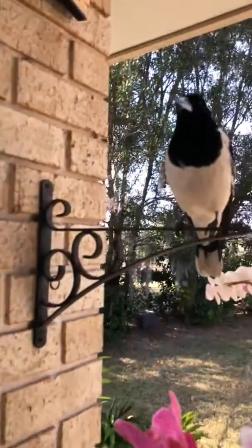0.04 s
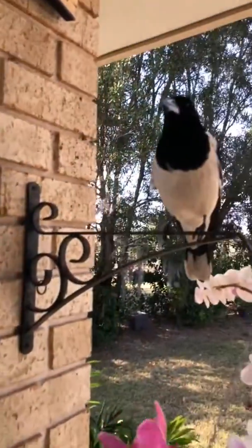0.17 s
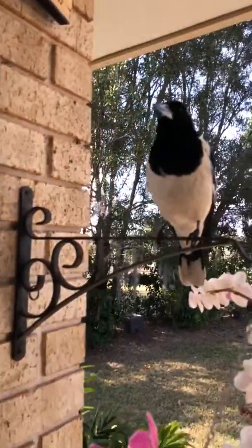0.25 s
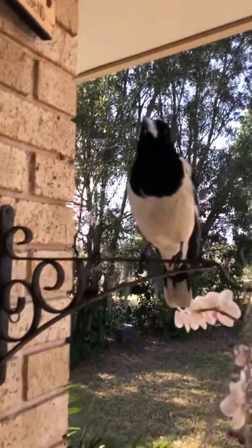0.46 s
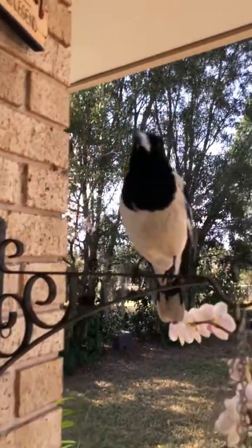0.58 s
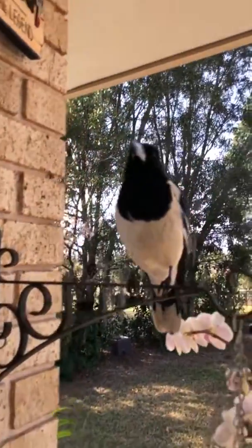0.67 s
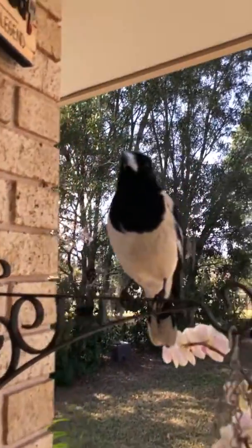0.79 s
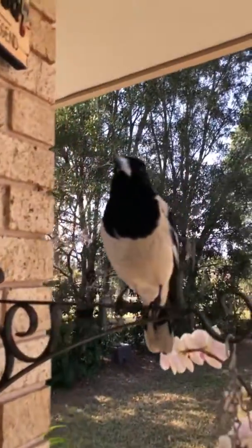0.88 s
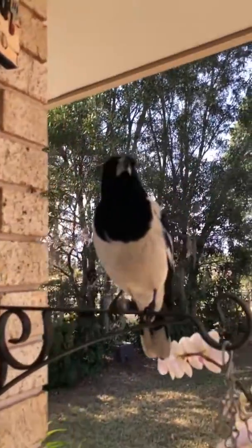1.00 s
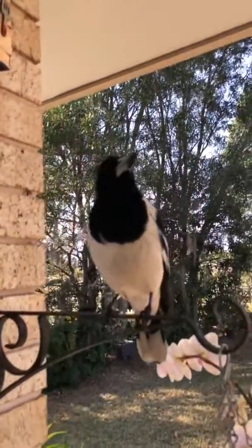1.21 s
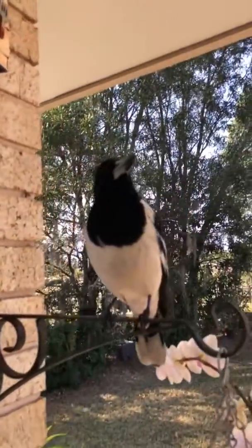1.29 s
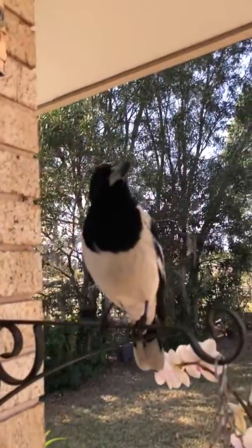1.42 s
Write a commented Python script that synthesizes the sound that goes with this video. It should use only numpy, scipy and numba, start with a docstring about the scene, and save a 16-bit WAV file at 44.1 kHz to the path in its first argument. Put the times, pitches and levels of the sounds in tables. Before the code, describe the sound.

Close butcherbird song of clear whistles and short rasps, another bird chirping faintly behind.

```python
"""Under a veranda roof, beside a garden. Over a low outdoor rumble a small bird chirps in the trees.
Close by, a butcherbird sings: a falling slur on two voices, two harsh rasps, a long low flute note,
a soft rasp and a thin closing note. Its whistles are nearly pure tones; its rasps are uneven pulses
from the voice organ that ring in the throat and windpipe. Wall and roof add a short ring."""
import sys
import numpy as np
from scipy import signal
from scipy.fft import rfft, irfft, next_fast_len
from scipy.io import wavfile
from scipy.ndimage import uniform_filter1d
from numba import njit

SR = 44100
rng = np.random.default_rng(int(sys.argv[2]) if len(sys.argv) > 2 else 0)


def master_out(mix):
    """Clip the mix to full scale and print it as 16-bit PCM to the path in sys.argv[1]."""
    frames = np.transpose(np.atleast_2d(mix))
    ceiling = np.clip(frames, -1, 1)
    pcm = np.round(ceiling * 32767).astype(np.int16)
    wavfile.write(sys.argv[1], SR, pcm)


N = 63945
T = np.arange(-int(.2 * SR), N) / SR  # time [s]; starts early so echoes are already ringing
TOP_HZ, FLICKER_HZ = 15750, 60  # highest overtone; how fast overtones come and go


def gain(db):
    """Turn decibels into a multiplier."""
    return 10 ** (np.asarray(db) / 20)


def unit(x):
    """Scale to an average power of 1."""
    return x / np.sqrt(np.mean(x ** 2))


def curves(table, start=0):
    """Join a table's rows into curves over time, plus a gate that is 0 beyond its ends."""
    rows = np.array(table, float)
    times = rows[:, 0] + start
    gate = uniform_filter1d(((T >= times[0]) & (T <= times[-1])) * 1., size=128)
    return [np.interp(T, times, column) for column in rows.T[1:]] + [gate]


def gain_at(spectrum, hz):
    """Look up the multiplier at each frequency."""
    freqs, db = np.array(spectrum, float).T
    return gain(np.interp(np.log(hz + 1), np.log(freqs), db))


def colour(x, spectrum):
    """Filter by rows of (frequency [Hz], gain [dB])."""
    size = next_fast_len(len(x))
    hz = np.arange(size // 2 + 1) * SR / size
    return irfft(rfft(x, size) * gain_at(spectrum, hz), size)[:len(x)]


def noise():
    """Plain white hiss."""
    return rng.standard_normal(len(T))


def wobble(rate):
    """A smooth random curve that turns about `rate` times a second."""
    width = max(int(SR / rate), 1)
    return unit(uniform_filter1d(uniform_filter1d(noise(), width), width))


def wavering_phase(hz, waver, rate):
    """The angle of a vibration whose pitch strays by the fraction `waver`."""
    return 2 * np.pi * np.cumsum(hz * (1 + waver * wobble(rate))) / SR


def steady(x):
    """Even out the loudness."""
    return x / np.sqrt(np.abs(uniform_filter1d(x ** 2, size=400)) + 1e-12)


@njit
def resonate(x, hz, width):
    """A moving resonance: the smaller its width, the more it rings."""
    y, band, low = np.empty(len(x)), 0., 0.
    for i in range(len(x)):
        g = np.tan(np.pi * hz[i] / SR)
        v = (band + g * (x[i] - low)) / (1 + g * (g + width))
        band, low = 2 * v - band, low + 2 * g * v
        y[i] = width * v
    return y


def echoes(x, fade_s, delay_s, treble_db):
    """Scattered reflections, duller than the source, that drop 60 dB in `fade_s`."""
    t = np.arange(len(T)) / SR
    tail = unit(noise() * (t > delay_s) * np.exp(-np.log(1000) * t / fade_s)) / np.sqrt(len(t))
    return colour(signal.fftconvolve(x, tail)[:len(T)], [(2500, 0.006), (12000, treble_db)])


def whistle(table, overtones, start=0, waver=0.004, flutter_db=0.96):
    """A slightly trembling tone whose upper overtones come and go."""
    hz, db, gate = curves(table, start)
    phase = wavering_phase(hz, waver, rate=400)
    tone = np.sin(phase)
    for k in range(2, int(TOP_HZ / hz.min()) + 1):
        flicker = 1 + 0.33 * (k > 2) * wobble(FLICKER_HZ)
        tone += flicker * gain_at(overtones, k * hz) * (k * hz < TOP_HZ) * np.sin(k * phase)
    return np.sqrt(2) * tone * gate * gain(db + flutter_db * wobble(61))


def voice_organ(hz, rough):
    """A bird's membranes pulse: evenly at roughness 0, as pure noise from 1 up."""
    rough = np.clip(rough, 0, 1)
    phase = wavering_phase(hz, .06 * rough, rate=500)
    pulses = sum(np.cos(k * phase) * (k * hz < TOP_HZ) for k in range(1, int(TOP_HZ / hz.min()) + 1))
    puffs = noise() * (1 + np.cos(phase))
    return np.sqrt(1 - rough ** 2) * unit(pulses) + rough * unit(puffs)


# Tone colour of the outdoor background: (frequency [Hz], gain [dB])
HISS_COLOUR = [(25, -29), (50, -12.5), (100, -6.5), (180, -11.5), (260, -9.5), (350, -14.5), (550, -19),
               (1000, -18.5), (1700, -19), (2400, -26), (4000, -29.5), (8000, -34), (12000, -37),
               (15600, -44)]
RUMBLE_COLOUR = [(15, -45), (30, -25.5), (48, -7.5), (70, 0), (100, 0), (125, -12.5), (200, -18.5),
                 (320, -29), (700, -52)]

def garden():
    """Faint hiss, a low rumble and one soft low bump."""
    hiss = unit(colour(noise(), HISS_COLOUR))
    rumble = unit(colour(noise(), RUMBLE_COLOUR))
    bump = np.exp(-((T - 1.15) / 0.0075) ** 2 / 2) * np.sin(2 * np.pi * 202.4 * T)
    return gain(-66) * hiss + gain(-61.5) * rumble + gain(-50) * bump


# Distant chirps: (start time [s], base level [dB])
CHIRPS = [(-.085, -58), (.505, -53.5), (1.1, -53)]
# A chirp's two voices: (time into the chirp [s], pitch [Hz], relative level [dB])
CHIRP_LOW = [(0, 2343, -30.5), (.014, 2470, -8.5), (.026, 2590, -7.5), (.04, 2870, -10.5),
             (.05, 2735, -19.5)]
CHIRP_HIGH = [(.022, 3520, -1.5), (.029, 3930, -1), (.038, 4070, 8), (.05, 4500, -2), (.062, 4280, -25)]
# Their overtones: (frequency [Hz], level relative to the base tone [dB])
LOW_OVERTONES = [(4700, 1.5), (5100, 8), (5700, -4), (7000, -25.5), (8000, -9.5), (9500, -26),
                 (11500, -15.5), (15000, -36.5)]
HIGH_OVERTONES = [(8000, -25.5), (12000, -36), (16000, -43)]

def small_bird():
    """Rising, hoarse two-voiced chirps, smeared by echoes from the trees."""
    voices = (CHIRP_LOW, LOW_OVERTONES), (CHIRP_HIGH, HIGH_OVERTONES)
    chirps = sum(gain(db) * whistle(voice, overtones, start, waver=.022, flutter_db=3.5)
                 for start, db in CHIRPS for voice, overtones in voices)
    trees = echoes(chirps, fade_s=0.45, delay_s=0.0034, treble_db=-2.5)
    return gain(-2.5) * chirps + gain(-1.5) * trees


# Tone colour of the veranda's echo: (frequency [Hz], gain [dB])
VERANDA_COLOUR = [(630, -2.5), (760, 3), (870, -4), (1300, 2.5), (1750, -5), (3000, 1)]

def veranda(song):
    """Wall and roof throw the song back as a short ring."""
    ring = echoes(song, fade_s=0.36, delay_s=0.0061, treble_db=-6)
    return gain(-13.5) * colour(ring, VERANDA_COLOUR)


# The butcherbird's breath: (time [s], level [dB])
BREATH = [(.19, -66), (.21, -63.5), (.235, -57.5), (.26, -58.5), (.29, -81), (.65, -83), (.662, -46),
          (.677, -45), (.69, -59), (.718, -84.5), (.728, -46), (.745, -52.5), (.77, -58.5), (.83, -96.5),
          (1.275, -92), (1.296, -52.5), (1.315, -56.5), (1.335, -58.5), (1.36, -90)]
# Its tone colour: (frequency [Hz], gain [dB])
BREATH_COLOUR = [(400, -28), (750, 4), (1150, 0), (1450, -2.5), (2100, -8), (3200, 0), (4000, -8),
                 (5000, -19.5), (6000, -8), (8500, -19.5), (11000, -36), (16000, -33.5)]

def bill(click_s=.7187, decay_s=0.00065):
    """Air rushes through the bill, which gives one tiny click as it opens."""
    db, gate = curves(BREATH)
    click_shape = (T >= click_s) * np.exp(-np.abs(T - click_s) / decay_s)
    click = click_shape * unit(resonate(noise(), np.full(len(T), 7000.), 0.87))
    air = unit(colour(noise(), BREATH_COLOUR))
    return air * gate * gain(db) + gain(-49) * click


# Buzz on the whistles: (time [s], pitch [Hz], level [dB], roughness [0-1])
BUZZ = [(.28, 763, -71.5, .2), (.31, 766, -76, 0.3), (.345, 746, -65.5, 0.23), (.385, 724, -59, 0.5),
        (.405, 675, -77.5, 0.3), (.42, 700, -90, 0.5)]
# Windpipe resonances, bill nearly shut: (frequency [Hz], gain [dB])
SHUT_WINDPIPE = [(1500, -29.5), (2200, 5), (2700, -12), (4000, -5.5), (5300, -13.5), (6200, -3),
                 (6700, -5.5), (7300, 6), (8000, -15), (9500, -16), (10300, -6), (11000, -14.5),
                 (11900, -1.5), (13000, -20), (14200, -13.5), (15300, -10), (16000, -13)]

def buzz():
    """Faint high overtones where the two voices rub together."""
    hz, db, rough, gate = curves(BUZZ)
    return steady(colour(voice_organ(hz, rough), SHUT_WINDPIPE)) * gate * gain(db)


# Thin top of the rasps: (time [s], pitch [Hz], level [dB], roughness [0 = smooth], resonance [Hz])
SIZZLE = [(.65, 920, -87.5, 0.89, 6080), (.664, 898, -56, 1.11, 6200), (.674, 915, -49.5, 0.7, 6300),
          (.692, 920, -75, 1.06, 7800), (.72, 713, -79, 0.96, 8200), (.731, 690, -43, 0.8, 7860),
          (.746, 684, -58.5, 0.8, 8360), (.752, 672, -55.5, 0.8, 10800), (.762, 665, -50, 0.6, 10600),
          (.769, 644, -51, 0.3, 9200), (.79, 660, -54.5, .35, 9100), (.815, 636, -73, 0.5, 9000),
          (.85, 648, -87, .4, 9200)]
# Windpipe resonances, bill open: (frequency [Hz], gain [dB])
OPEN_WINDPIPE = [(2000, -25.5), (4500, -20.5), (5900, 6.5), (7100, -7.5), (8200, 6), (9100, 0), (9800, -11),
                 (11000, -1), (12300, -12.5), (13700, -4), (16000, -13.5)]

def sizzle():
    """High overtones ring the open windpipe, with one resonance leading."""
    hz, db, rough, peak_hz, gate = curves(SIZZLE)
    pipe = colour(voice_organ(hz, rough), OPEN_WINDPIPE)
    peak = resonate(pipe, peak_hz, 1 / 12.4)
    return steady(peak + gain(-12.5) * pipe) * gate * gain(db)


# Reedy notes: (time [s], pitch [Hz], base tone [dB], first overtone [dB], second overtone [dB])
REEDY_NOTE = [(.735, 688.3, -53, -52, -70.5), (.749, 685.6, -53, -50, -51), (.762, 654, -46, -43, -31.5),
              (.773, 675, -50, -36.5, -46), (.787, 641.4, -49.5, -45.5, -45),
              (.807, 638, -48, -46.5, -63.5), (.82, 655.5, -64.5, -51.5, -69.5),
              (.85, 630, -59.5, -50.5, -71.5)]
CLOSING_NOTE = [(1.35, 1120, -71, -89, -75), (1.367, 1090, -66, -62, -61), (1.388, 1081, -62, -50, -73),
                (1.397, 1081, -61, -63.5, -68), (1.411, 1082, -54.5, -59, -72), (1.44, 1077, -49, -71, -73),
                (1.46, 1074, -51, -54, -84)]
# Their weak higher overtones: (frequency [Hz], level relative to the base tone [dB])
REEDY_OVERTONES = [(3000, -25), (4300, -36.5), (5500, -32.5), (6500, -28), (7500, -20), (9000, -38),
                   (12000, -43), (16000, -32)]

def reedy_notes():
    """Two unsteady notes whose weight sinks to the lower tones as the bill closes."""
    notes = 0
    for table in REEDY_NOTE, CLOSING_NOTE:
        hz, *levels, gate = curves(table)
        phase = wavering_phase(hz, 0.013, rate=170)
        strong = sum(gain(db + wobble(100)) * np.sin(k * phase) for k, db in enumerate(levels, 1))
        weak = sum(gain_at(REEDY_OVERTONES, k * hz) * wobble(FLICKER_HZ) * np.sin(k * phase)
                   for k in range(len(levels) + 1, int(TOP_HZ / hz.max())))
        notes += np.sqrt(2) * gate * (strong + gain(levels[0]) * weak)
    return notes


# Rasps: (time [s], pitch [Hz], level [dB], throat resonance [Hz], roughness [0-1])
FIRST_RASP = [(.652, 934.5, -69, 4230, 0.75), (.664, 920, -42, 3930, 0.83), (.672, 912, -43.5, 3030, 0.46),
              (.683, 968, -51, 2820, 0.77), (.695, 948, -51.5, 2880, 0.8), (.712, 897, -63, 2920, 0.8)]
SECOND_RASP = [(0.721, 740, -49, 4800, .9), (0.727, 733.7, -45.5, 4470, .9),
               (0.738, 686.4, -42.5, 3600, .8), (0.748, 670.6, -38, 2600, 0.5),
               (.757, 665, -43.5, 2560, 0.55), (0.769, 669.5, -50, 2810, 0.3), (.79, 640, -68.5, 2980, 0.6),
               (.82, 649, -65.5, 3224, 0.7)]
SOFT_RASP = [(1.278, 640, -78, 3380, 0.89), (1.296, 649.7, -59, 3495, 0.87), (1.311, 639, -59, 2940, 0.41),
             (1.32, 658, -48, 2680, 0.33), (1.327, 663, -61, 2600, 0.33), (1.344, 670, -59.5, 2790, 0.85),
             (1.365, 670, -66.5, 3150, .5), (1.40, 670, -68, 3200, 0.42)]

def rasps(sharpness=4.3, grit_db=2.5):
    """Rough pulses pass through a throat resonance that sinks as the bill closes."""
    notes = 0
    for table in FIRST_RASP, SECOND_RASP, SOFT_RASP:
        hz, db, throat_hz, rough, gate = curves(table)
        pulses = voice_organ(hz, rough)
        throat = resonate(pulses, throat_hz, 1 / sharpness)
        throat = resonate(throat, throat_hz, 2 / sharpness)
        octave_below = gain(-9) * resonate(pulses, throat_hz / 2, 0.24)
        notes += steady(throat + octave_below) * gate * gain(db + grit_db * rough * wobble(400))
    return notes


# Whistled notes: (time [s], pitch [Hz], level [dB])
LEAD_IN = [(.045, 710, -62), (.06, 766, -53.5), (.072, 797, -50), (.095, 788, -58), (.11, 780, -65.5)]
SLUR = [(.193, 1677, -60), (.205, 1708, -34.5), (.218, 1737, -21.5), (.234, 1733, -18.5),
        (.241, 1703, -20.5), (.248, 1635, -33.5), (.257, 1567, -19.5), (.272, 1337, -29.5),
        (.29, 1105, -32), (.305, 986, -40.5), (.318, 915, -46.5), (.335, 858, -36), (.355, 861.4, -35),
        (.41, 862, -31.5), (.44, 862.5, -34.5), (.465, 853.6, -40), (.49, 866, -51), (.51, 859.6, -68.5)]
SECOND_VOICE = [(.232, 801, -67), (.254, 794, -48), (.295, 775.3, -38), (.317, 760.5, -32.5),
                (.34, 754, -46.5), (.378, 778, -42.5), (.392, 775, -29), (.407, 769.6, -44),
                (.432, 773, -44.5), (.462, 741.2, -45), (.487, 745.8, -56), (.51, 762.5, -57),
                (.545, 726, -66)]
UNDER_RASPS = [(0.637, 880, -65), (0.663, 944.6, -50.5), (.70, 939, -47.5), (0.713, 893, -46),
               (.732, 898, -37.5), (.745, 841, -50.5), (0.764, 880, -57.5)]
FLUTE = [(.85, 650, -52), (.862, 634.3, -40), (0.88, 673.7, -36.5), (0.894, 658, -38.5),
         (0.926, 644.8, -32), (1.0, 636.3, -35), (1.164, 629, -37), (1.25, 623.6, -35.5),
         (1.274, 651.6, -35.5), (1.284, 644, -46), (1.297, 640, -49)]
# Their overtones: (frequency [Hz], level relative to the base tone [dB])
LEAD_OVERTONES = [(1550, -12), (2400, -27.5), (4000, -35), (9000, -61.5)]
SLUR_OVERTONES = [(1500, -34), (2400, -45.5), (3100, -50), (3500, -49), (4200, -53), (5100, -48),
                  (7000, -62), (15000, -67.5)]
FLUTE_OVERTONES = [(1270, -37.5), (1900, -50), (3200, -61), (5000, -56.5), (6800, -52.5), (8500, -65.5),
                   (10000, -73.5), (11500, -54), (13000, -66), (14700, -55.5), (16000, -59)]

def whistles():
    """The clear notes, from a quiet lead-in to the long low flute note."""
    return (whistle(LEAD_IN, LEAD_OVERTONES)
            + whistle(SLUR, SLUR_OVERTONES)
            + whistle(SECOND_VOICE, SLUR_OVERTONES, waver=0.01)
            + whistle(UNDER_RASPS, SLUR_OVERTONES, waver=0.0096)
            + whistle(FLUTE, FLUTE_OVERTONES, waver=0.0041, flutter_db=0.84))


def butcherbird():
    """The whole phrase, ringing under the roof."""
    song = whistles() + rasps() + reedy_notes() + buzz() + sizzle() + bill()
    return song + veranda(song)


def scene():
    """Both birds and the garden, in one channel."""
    return (butcherbird() + small_bird() + garden())[None, -N:]


def record(dry):
    """Cut off the very highest treble."""
    return signal.sosfilt(signal.ellip(10, .1, 80, TOP_HZ, fs=SR, output="sos"), dry)


dry = scene()
out = record(dry)
master_out(out)
```